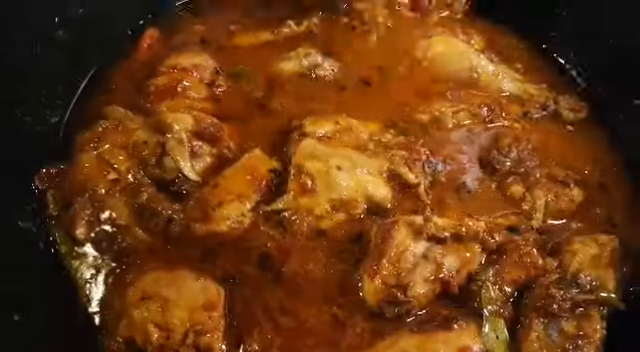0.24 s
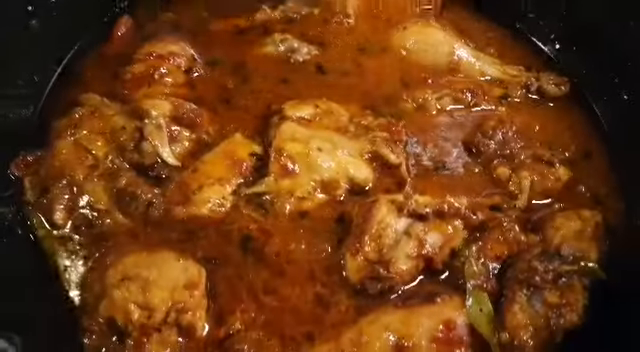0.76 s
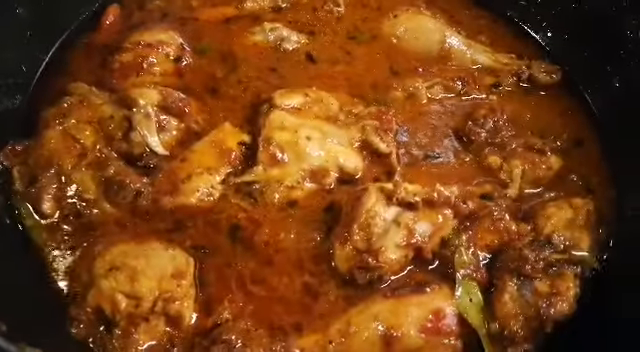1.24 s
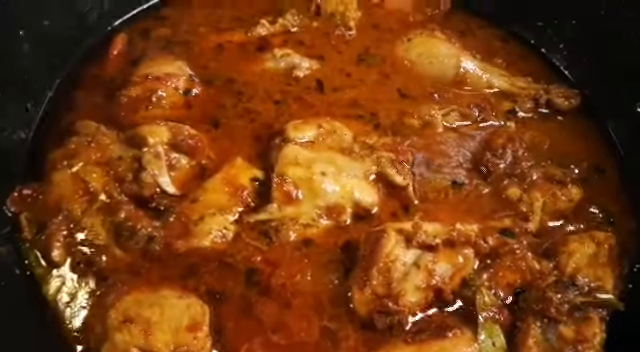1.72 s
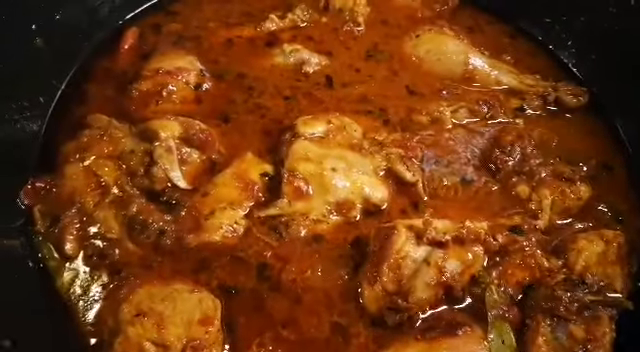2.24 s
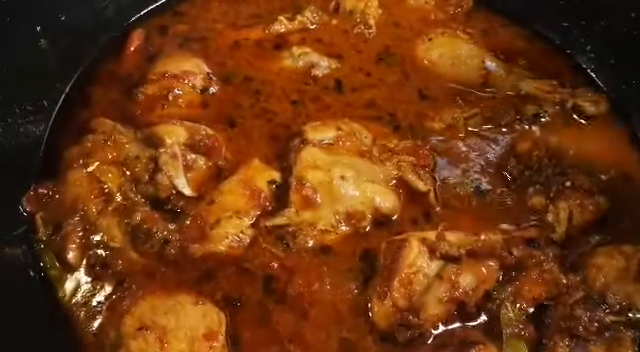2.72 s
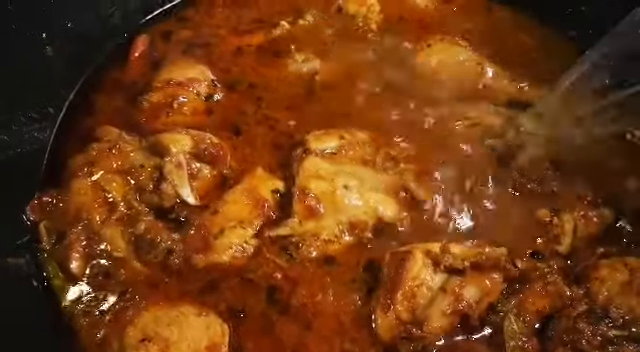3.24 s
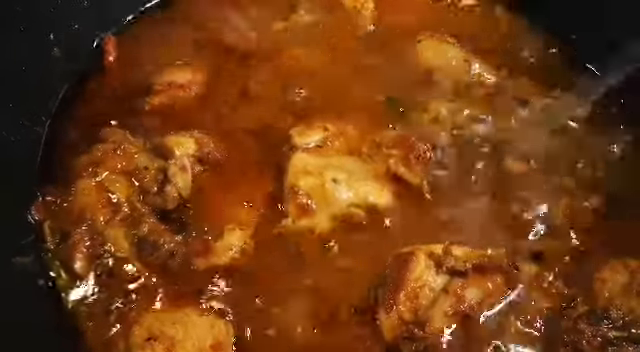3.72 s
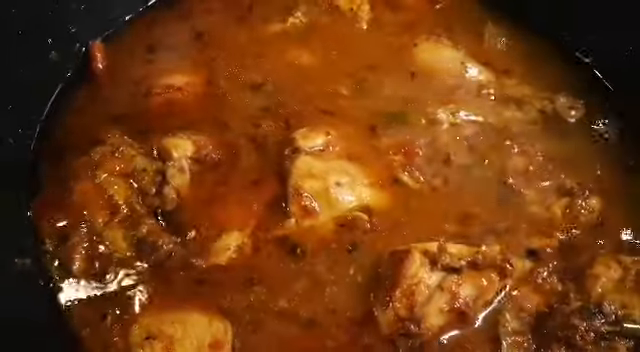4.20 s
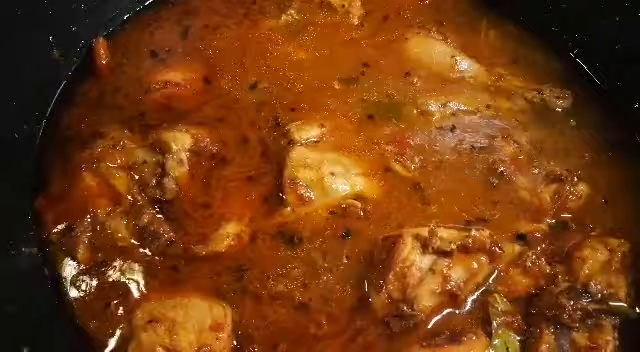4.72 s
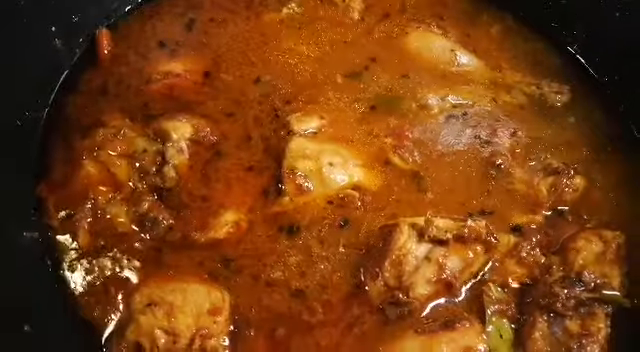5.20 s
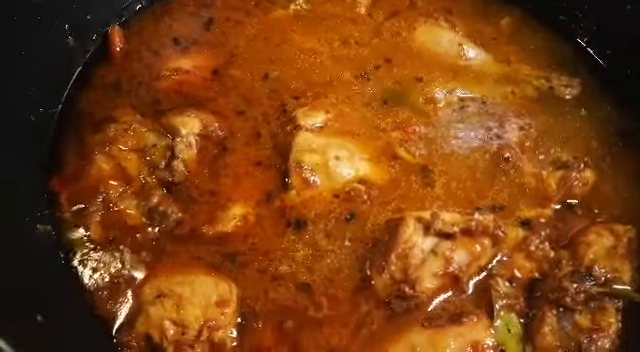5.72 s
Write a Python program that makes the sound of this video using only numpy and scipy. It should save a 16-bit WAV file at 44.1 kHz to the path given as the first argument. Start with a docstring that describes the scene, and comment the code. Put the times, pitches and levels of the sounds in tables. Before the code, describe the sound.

Close stereo pickup in a quiet, tiled kitchen with low hum and muffled street rumble. A spoon briefly scrapes and taps a thick pot, with sparse tiny pops. A jug shifts softly, then a vessel knocks loudly on the counter. Water splashes in from the left for about a second, thinning to drips, before the jug is set down and rocks.

```python
"""A quiet tiled kitchen over street rumble, hum and hiss, shaped noise that comes through walls and microphones.
First a spoon scrapes and taps a pot of thick gravy, as noise and impulses drive the pot's resonances; small film
bursts tick now and then. A faint far horn, two sine tones, toots at 1 s and 4 s; a jug shifts softly at 1.9 s and
a vessel knocks on the counter at 2.6 s. From 2.9 s water pours from the left, a sheet breaking into drops, heard
as damped bubble tones; at 4.7 s the jug is set down and rocks. Soft thuds fall at 2.4, 2.6 and 5.4 s."""
import sys
import numpy as np
from scipy import signal
from scipy.fft import rfft, irfft, next_fast_len
from scipy.io import wavfile
from scipy.ndimage import uniform_filter1d, map_coordinates

SR = 44100
rng = np.random.default_rng(int(sys.argv[2]) if len(sys.argv) > 2 else 0)


def output_pcm(signal):
    """Save a mono or channel-first signal as 16-bit PCM at the path in sys.argv[1].

    Samples are clipped to [-1, 1] before scaling.
    """
    pcm = np.clip(np.atleast_2d(signal).T, -1, 1) * 32767
    wavfile.write(sys.argv[1], SR, np.round(pcm).astype(np.int16))


N = 262836  # samples


def amp(db):
    """Level law: 20 dB is a tenfold amplitude."""
    return 10 ** (np.asarray(db) / 20)


def unit(x):
    """Normalisation to a root-mean-square of 1."""
    return x / np.sqrt(np.mean(x ** 2) + 1e-20)


def along(points, hz):
    """Interpolation of (Hz, value) points on a logarithmic frequency axis."""
    f, v = np.transpose(points)
    return np.interp(np.log(hz + 1), np.log(f + 1), v)


def curves(rows, outside=None):
    """Linear interpolation in time: one value per sample for each column after the time."""
    s, *cols = np.transpose(rows)
    return [np.interp(np.arange(N) / SR, s, c, outside, outside) for c in cols]


def wobble(rate):
    """Slow random modulation: a smooth curve through `rate` random knots a second."""
    knots = rng.standard_normal(int(N * rate / SR) + 4)
    return map_coordinates(knots, [np.arange(N) * rate / SR])


def swells(s, length, db):
    """Gaussian envelopes: bell-shaped level bumps."""
    t = np.arange(N) / SR
    return sum(amp(d) * np.exp(-.5 * ((t - a) / b) ** 2) for a, b, d in zip(s, length, db))


def filtered(x, response):
    """Linear filtering: the spectrum of x times a complex response of frequency."""
    m = next_fast_len(N + SR // 2)
    return irfft(rfft(x, m) * response(np.fft.rfftfreq(m, 1 / SR)), m)[..., :N]


def log_band(x, centre_hz, width):
    """Band-pass filtering: a bell on the log-frequency axis."""
    return filtered(x, lambda f: np.exp(-.5 * (np.log(f / centre_hz + 1e-9) / width) ** 2))


def resonant(x, modes):
    """Modal response: parallel resonances of alternating sign, as in a vibrating body."""
    def response(f):
        return sum((-1) ** k * amp(db) * 1j * f * width / (centre ** 2 - f * f + 1j * f * width)
                   for k, (centre, width, db) in enumerate(modes))
    return filtered(x, response)


# Likeness of the two ports in a diffuse field. Each row: frequency in Hz, left-right correlation.
PORT_LIKENESS = [(60, 1), (240, 0.86), (700, 0), (15000, 0)]


def paired(pair):
    """Diffuse-field coherence: two unrelated signals become a left and right alike only in the bass."""
    def mix(hz):
        turn = np.arccos(np.clip(along(PORT_LIKENESS, hz), -1, 1)) / 2
        return np.array([np.cos(turn), np.sin(turn)])
    mid, side = filtered(pair, mix)
    return np.array([mid + side, mid - side])


def rush(spectrum):
    """Broadband turbulence-like noise: diffuse stereo of rms 1 with the given spectrum."""
    return unit(paired(filtered(rng.standard_normal((2, N)), lambda hz: amp(along(spectrum, hz)))))


def placed(x, pan_db, lead_s):
    """Interaural cues: sound reaches the left port lead_s early; the body shades only the treble."""
    sign = np.array([[.5], [-.5]])

    def response(hz):
        shade = amp(sign * pan_db * hz / (hz + 500))
        return shade * np.exp(2j * np.pi * hz * sign * lead_s)
    return filtered(x, response)


# Background. Each row: time in seconds, hum level in dB, street level in dB.
AIR_LEVELS = [(0, -61, -65), (1.72, -59.5, -61), (1.78, -58.5, -66), (2.9, -62.5, -67.5), (3.4, -62, -75.5),
              (4.25, -60.5, -65), (4.6, -60.5, -69.5), (5.96, -61, -67)]
# Deepest rumble. Each row: time in seconds, level in dB.
DEEP_LEVELS = [(.55, -64.5), (.9, -61.5), (1.1, -51.5), (1.28, -40.5), (1.46, -58), (1.6, -55.5),
               (1.74, -55), (1.85, -86)]
# Noise spectra of room hum, street and microphones. Each row: frequency in Hz, relative density in dB.
HUM_SPECTRUM = [(26, -57.5), (45, -2.5), (108, 1.5), (150, -7), (210, -2), (248, -18), (327, -12),
                (450, -25.5), (580, -41), (990, -120)]
STREET_SPECTRUM = [(180, -20), (300, -0.5), (708, -1.5), (1190, 3), (2170, -7.5), (5000, -16.5),
                   (6500, -69), (11000, -120)]
HISS_SPECTRUM = [(880, -29.5), (1500, -15), (4000, 0), (9500, -3.5), (11000, -8), (15800, -7.5),
                 (16500, -2.5)]


def air():
    """Incoherent summation: room hum, street noise, deep swells and microphone hiss."""
    hum_db, street_db = curves(AIR_LEVELS)
    deep_spectrum = [(12, -40.5), (24, -2.0), (38, 5.0), (55, -43), (80, -120)]  # Hz, dB
    deep = amp(curves(DEEP_LEVELS)[0]) * rush(deep_spectrum)
    hum = amp(hum_db + 1.1 * wobble(13)) * rush(HUM_SPECTRUM)
    street = amp(street_db + 0.28 * wobble(4)) * rush(STREET_SPECTRUM)
    hiss = amp(-68) * rush(HISS_SPECTRUM)
    return hum + street + deep + hiss


# Toots. Each row: centre in seconds, bell width in seconds, lower tone in dB, upper tone in dB.
HORN_TOOTS = [(1.027, 0.022, -60, -76), (3.997, 0.013, -60.5, -75), (4.262, 0.043, -59.5, -62.5)]
# The lower and upper tone, in Hz.
HORN_TONES = (860, 1295)


def horn():
    """Phase modulation: two overtones of a far horn, slightly unsteady."""
    s, length, *levels = np.transpose(HORN_TOOTS)
    toots = 0
    for hz, db in zip(HORN_TONES, levels):
        phase = 2 * np.pi * hz * np.arange(N) / SR + 0.7 * wobble(38)
        toots = toots + swells(s, length, db) * np.sin(phase)
    return placed(toots, pan_db=9.0, lead_s=.0001)


# Soft, heavy thuds. Each row: centre in seconds, bell width in seconds, level in dB, frequency in Hz.
THUDS = [(2.447, 0.012, -47, 99), (2.619, 0.012, -28.5, 84), (5.436, 0.0145, -56.5, 112)]


def bumps():
    """Damped impact: weight settles on something padded, a dull thud that swells in without a click."""
    thuds = 0
    for s, length, db, centre_hz in THUDS:
        rumble = unit(log_band(rng.standard_normal(N), centre_hz, 0.34))
        thuds = thuds + swells([s], [length], [db]) * rumble
    return thuds


def bubbles(s, hz, gain, cycles, rise):
    """Bubble resonance: damped sines with a soft start, rising as each bubble opens at the surface."""
    span = np.arange(min(SR // 50, int(16 * cycles / np.median(hz) * SR) + 8))
    t = span[None] / SR
    u = t * hz[:, None] / cycles  # time in decay constants
    envelope = gain[:, None] * np.exp(-u) * (1 - np.exp(-6 * u))
    wave = envelope * np.sin(2 * np.pi * hz[:, None] * t * (1 + rise * u))
    at = (np.round(s * SR).astype(int)[:, None] + span).ravel()
    return np.bincount(at, wave.ravel(), N + SR)[:N]


def splash(s, hz, db, cycles, rise, scatter_db):
    """Spatial spread: bubbles land over a wide patch, each with its own balance and delay."""
    side = rng.standard_normal((len(s), 2))
    ports = [bubbles(s + k * .00004 * side[:, 1], hz, amp(db + k * scatter_db * side[:, 0]), cycles, rise)
             for k in (1, -1)]
    return np.array(ports)


# Lone film bursts. Each row: start in seconds, level of the earliest droplets in dB, frequency in Hz.
FILM_BURSTS = [(0.1131, -29, 15200), (0.756, -38, 14900), (1.1574, -45, 7500), (2.8288, -31.5, 15200),
               (4.922, -36, 14000), (5.8441, -47.5, 12440)]


def simmer():
    """Film rupture: now and then a film bursts on the gravy and scatters a few tiny droplets."""
    s, db, hz = np.repeat(FILM_BURSTS, 8, axis=0).T
    later, tone = rng.random((2, len(s)))
    pitch = np.clip(hz * np.exp(0.18 * (tone - .65)), 300, 15800)
    spray = splash(s + 0.018 * later ** 2, pitch, db - 9 * later, cycles=0.58, rise=0.042, scatter_db=-6.5)
    return placed(spray, pan_db=3.5, lead_s=0.00048)


def struck(contacts, modes, flat_db, blow, hard_hz, brightens):
    """Impact excitation: a blow and short rattle per contact drive the body; part is heard directly."""
    force, t = np.zeros(N + SR), np.arange(SR // 8) / SR
    for s, db, length in contacts:
        burst = t / length * np.exp(1 - t / length) * rng.standard_normal(len(t))
        burst[0] = -blow / np.sqrt(length)  # with a blow, brief contacts are mostly that blow
        # hard_hz is the edge at 0 dB; where brightens is above zero, soft contacts are duller
        edge = np.clip(hard_hz * amp(brightens * db), 100, 9000)
        band = signal.butter(2, [50, edge], "band", fs=SR, output="sos")
        soft = signal.sosfilt(band, burst)
        force[round(s * SR):][:len(t)] += amp(db) * soft / np.abs(soft).max()
    force = force[:N]
    direct = filtered(force, lambda f: 1j * f / (1j * f + 250))
    return resonant(force, modes) + amp(flat_db) * direct


# Soft shifts of the jug. Each row: start in seconds, force in dB, rattle time constant in seconds.
JUG_NUDGES = [(1.875, -39.5, 0.013), (1.908, -28.5, 0.0064), (1.94, -37, 0.0088)]
# Contacts as the jug is set down and rocks. Each row: start in seconds, force in dB, time constant in seconds.
JUG_SETS = [(4.7258, -5.5, 0.0021), (4.752, -17.5, 0.0045), (4.767, -33, 0.012), (4.88, -22, 0.0093),
            (5.015, -43, 0.0096)]
# Resonances of the jug. Each row: frequency in Hz, width in Hz, gain in dB.
JUG_MODES = [(76, 6.4, 7), (200.6, 30, 9), (354.3, 37, 12.5), (425.5, 160, 6), (869.4, 44, 17),
             (879, 9, 14), (1177, 200, 6), (1564, 720, 8), (2230, 1490, -17)]


def jug():
    """Modal excitation: the jug's body rings when shifted softly, then when set down and rocking."""
    shifted = struck(JUG_NUDGES, JUG_MODES, flat_db=2.5, blow=0, hard_hz=337, brightens=0)
    set_down = struck(JUG_SETS, JUG_MODES, flat_db=-0.5, blow=0.49, hard_hz=2305, brightens=0.25)
    return placed(shifted, pan_db=5, lead_s=0.00054) + placed(set_down, pan_db=-1.5, lead_s=-0.000298)


# Vessel contacts. Each row: start in seconds, force in dB, rattle time constant in seconds.
KNOCK_CONTACTS = [(2.5949, 0, 0.0023), (2.6015, -12, 0.0026), (2.636, -15.5, 0.0019)]
# Resonances of the counter. Each row: frequency in Hz, width in Hz, gain in dB.
COUNTER_MODES = [(74.6, 33, 15.5), (98, 17, 20), (199, 29, 12), (362, 20, 15), (517, 53, 4.5),
                 (874, 202, 4), (1287, 150, 1.5), (1587, 93, 8), (4340, 310, -7.5)]
COUNTER_MODES += [(2290, 8, 8), (2335, 10, 8)]  # two narrow, ringing modes


def knock():
    """Modal excitation: a vessel knocks on the counter, which rings in its own modes."""
    hit = struck(KNOCK_CONTACTS, COUNTER_MODES, flat_db=-7.0, blow=0.64, hard_hz=4000, brightens=0.45)
    return placed(hit, pan_db=5, lead_s=-0.00011)


# Spoon strokes. Each row: centre in seconds, bell width in seconds, level in dB, bright part in dB over it.
SPOON_STROKES = [(.008, 0.012, -45.5, -34), (0.062, 0.0026, -56.5, -10), (0.155, 0.0068, -55, -16),
                 (0.224, 0.013, -52.5, -11.5), (0.497, 0.0116, -70.5, 8), (2.444, 0.0096, -61, -10.5)]
# Spoon taps. Each row: time in seconds, force in dB.
SPOON_TAPS = [(0.154, -16), (0.229, -22.5)]
# Resonances of the full pot. Each row: frequency in Hz, width in Hz, gain in dB.
POT_MODES = [(1513, 170, 14), (1657, 130, 11), (1849, 170, 14.5), (2520, 72, 1)]


def spoon():
    """Friction excitation: rough strokes and small taps excite the damped wall of the full pot."""
    s, length, db, bright_db = np.transpose(SPOON_STROKES)
    grit = rng.standard_normal(N) * amp(2.9 * wobble(150))
    taps = np.zeros(N)
    for at, tap_db in SPOON_TAPS:
        taps[round(at * SR)] = amp(tap_db)
    taps = uniform_filter1d(taps, size=9)  # the spoon's edge is blunt
    rasp = unit(log_band(grit, 6000, 0.35))
    stroke = swells(s, length, db) * unit(resonant(grit, POT_MODES))
    stroke = stroke + swells(s, length, db + bright_db) * rasp
    return placed(stroke + resonant(taps, POT_MODES), pan_db=9, lead_s=0.000688)


# The stream before its gushes. Each row: time in seconds, spray level in dB, fizz level in dB.
STREAM = [(2.922, -56.5, -75), (2.96, -55.5, -59), (3.04, -50, -58.5), (3.14, -55.5, -61.5),
          (3.23, -46, -56), (3.36, -38, -41), (3.47, -45.5, -44), (3.66, -45, -49), (3.85, -54.5, -66),
          (3.99, -52, -66), (4.03, -63, -91), (4.44, -65.5, -103)]


def cloud(gain, hz, spread, cycles, spike_db, count):
    """Bubble statistics: a stream of small bubbles of uneven size at random times."""
    when, tone, size = rng.random(count), rng.standard_normal(count), rng.standard_normal(count)
    s = STREAM[0][0] + when * (STREAM[-1][0] - STREAM[0][0])
    pitch = np.clip(hz[(s * SR).astype(int)] * np.exp(spread * tone), 300, 15800)
    db = spike_db * np.clip(size, -3, 2.2)
    x = splash(s, pitch, db, cycles, rise=0.025, scatter_db=5.0)
    return gain * x / np.std(x[x != 0])


# Single drops. Each row: time in seconds, level in dB, bubble frequency in Hz.
SINGLE_DROPS = [(2.9271, -27, 7160), (2.9485, -25.5, 3800), (2.9617, -22.5, 4300), (2.9954, -23, 4300),
                (3.0493, -26.5, 4770), (3.1158, -30, 6410), (3.1438, -35, 4530), (3.2117, -17.5, 8290),
                (3.257, -28.5, 4400), (3.2839, -25.5, 8700), (3.3013, -25.5, 3940), (3.3293, -24, 5030),
                (3.3903, -31, 3100), (3.427, -25, 6900), (3.471, -24.5, 3770), (3.5533, -19.5, 9000),
                (3.5728, -22, 9000), (3.5903, -18, 7900), (3.632, -26.5, 7500), (3.66, -23.5, 7800),
                (3.6761, -28, 8080), (3.6985, -32.5, 4150), (3.715, -29.5, 7600), (3.7315, -28.5, 7760),
                (3.754, -21, 8030), (3.763, -26.5, 6200), (3.79, -27, 13200), (3.821, -28.5, 3950),
                (3.8741, -16.5, 7900), (3.89, -23, 9000), (3.9559, -28.5, 4400), (3.972, -41.5, 2750),
                (4.1598, -36.5, 13000), (4.358, -31, 10900), (4.377, -32, 12800), (4.394, -29, 10200),
                (4.4826, -31.5, 12800), (4.585, -30.5, 15100), (4.637, -30, 15600)]


def drops():
    """Impact and entrainment: each drop smacks the surface and traps a few bubbles of like size."""
    s, db, hz = np.transpose(SINGLE_DROPS)
    later = rng.random((len(s), 3, 2))
    x = splash(s, np.full(len(s), 9000.), db - 9, cycles=.6, rise=0, scatter_db=2)  # the smack
    for k in range(3):
        start = s + 0.0025 * k * later[:, k, 0]
        pitch = hz * (1 + 0.05 * k * (later[:, k, 1] - .5))
        x = x + splash(start, pitch, db - 4 * k, cycles=4.94, rise=0.0058, scatter_db=3)
    return x


# Gushes. Each row: centre in seconds, bell width in seconds, level in dB relative to the stream.
GUSHES = [(2.964, 0.006, 23.5), (3.003, 0.0087, 14.5), (3.055, 0.0046, 14), (3.088, 0.0048, 9),
          (3.223, 0.0083, 1.5), (3.883, 0.01, 16), (3.969, 0.0035, 13), (4.317, 0.0053, 9.5)]
# The stream digs in. Each row: centre in seconds, bell width in seconds, gurgle level in dB, frequency in Hz.
DEEP_PLUNGES = [(3, 0.022, -61, 1955), (3.09, 0.023, -60, 1590), (3.401, 0.027, -42, 2182),
                (3.531, 0.041, -40, 1460), (3.603, 0.015, -50.5, 1392), (3.844, 0.016, -60, 1235)]


def water():
    """Air entrainment: fine spray, fizz and, at deep plunges, larger gurgling bubbles; drops stand out."""
    ropes = amp(3 * wobble(230))  # the sheet tears into ropes
    flow = (1 + swells(*np.transpose(GUSHES))) * ropes
    spray_db, fizz_db = curves(STREAM, outside=-120)
    at, length, gurgle_db, gurgle_hz = np.transpose(DEEP_PLUNGES)
    pitch = np.interp(np.arange(N) / SR, at, gurgle_hz)
    gurgle_gain = flow * swells(at, length, gurgle_db)
    spray = cloud(flow * amp(spray_db), np.full(N, 10500.), 0.434, cycles=6.6, spike_db=7.0, count=10000)
    fizz = cloud(flow * amp(fizz_db), np.full(N, 4100.), 0.33, cycles=7.7, spike_db=6.5, count=8000)
    gurgle = cloud(gurgle_gain, pitch, 0.2014, cycles=8.7, spike_db=3.5, count=2500)
    return placed(spray + fizz + gurgle + drops(), pan_db=8.5, lead_s=.0006)


# Decay of the tiled room. Each row: frequency in Hz, reverberation time (60 dB decay) in seconds.
ROOM_DECAY = [(100, 0.56), (500, 0.45), (2300, 0.43), (3000, 0.3), (8000, 0.33), (15000, 0.12)]


def kitchen(x):
    """Reverberation: between hard walls each frequency of the tail dies at its own speed."""
    hz, t, z = signal.stft(rng.standard_normal((2, SR // 2)), SR, nperseg=256)
    decay = amp(-60 * t / along(ROOM_DECAY, hz)[:, None])
    tail = signal.istft(z * decay, SR, nperseg=256)[1]
    tail = tail / np.linalg.norm(tail[0])
    late = np.pad(x[0], (150, 0))[None]  # the left port, delayed 150 samples before the tail
    return paired(signal.fftconvolve(late, tail, axes=1)[:, :N])


def scene():
    """Superposition: direct sounds and their reverberation add to the horn and the background."""
    hits = knock() + jug() + bumps()
    near = water() + simmer() + spoon()
    room = amp(-17.5) * kitchen(near) + amp(-11) * kitchen(hits)
    return near + hits + room + horn() + air()


def record(dry):
    """Band limiting: nothing is kept from 16 kHz upwards."""
    return filtered(dry, lambda hz: hz < 16000)


dry = scene()
out = record(dry)
output_pcm(out)
```